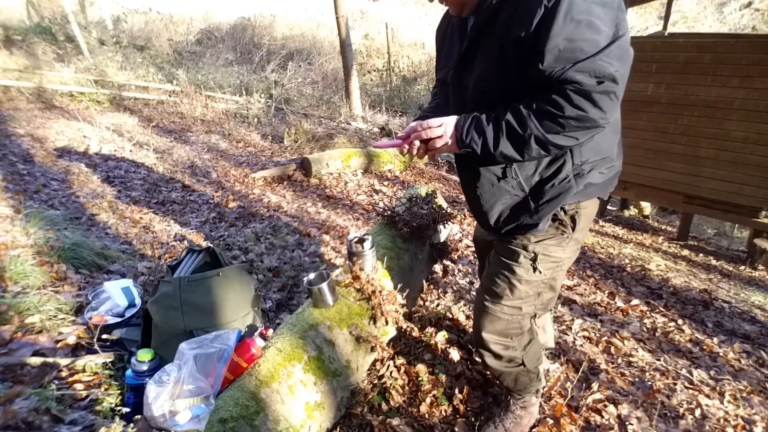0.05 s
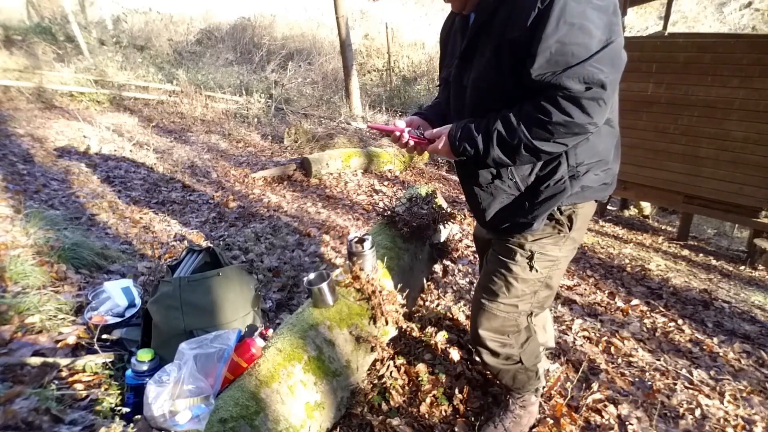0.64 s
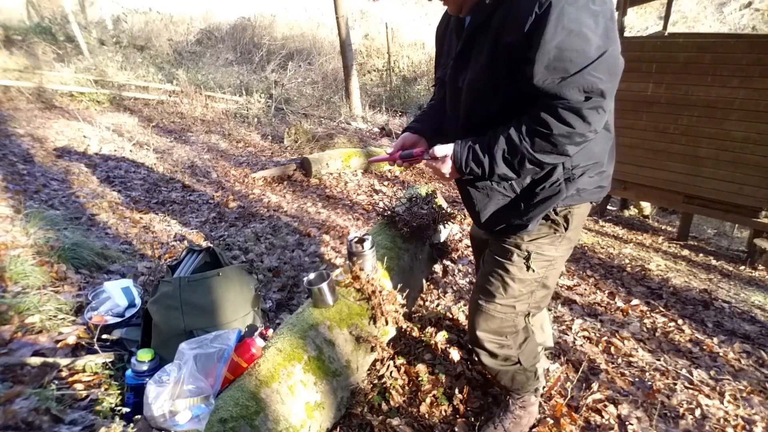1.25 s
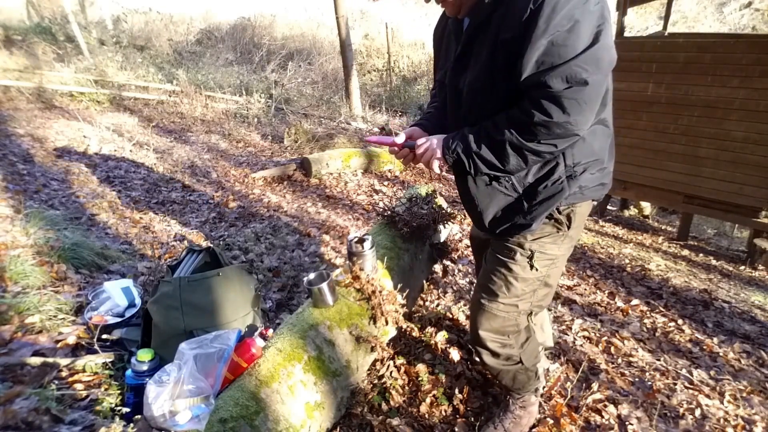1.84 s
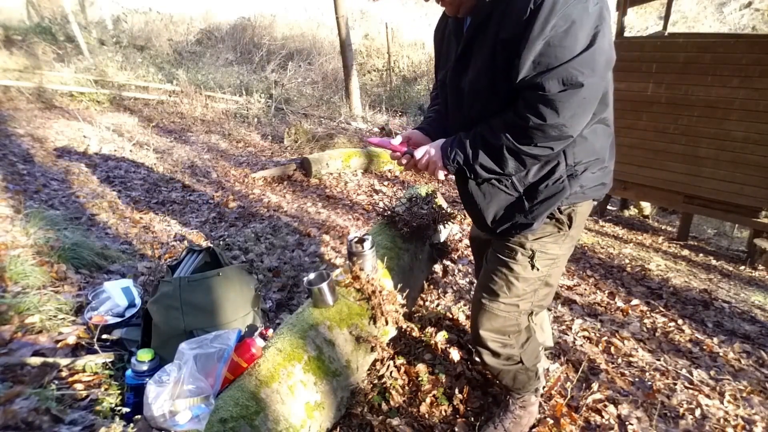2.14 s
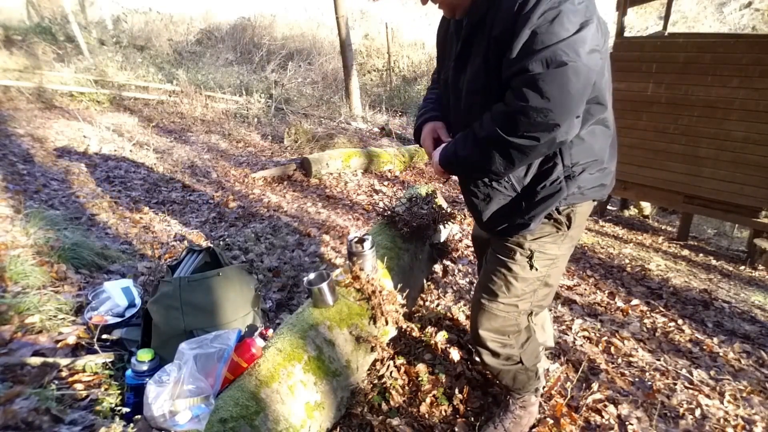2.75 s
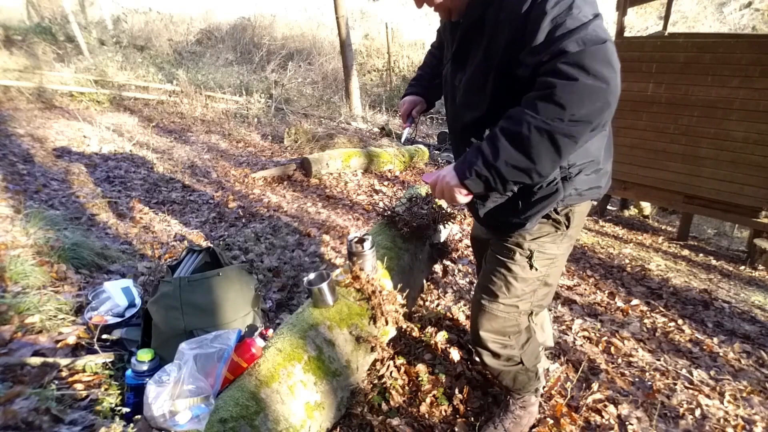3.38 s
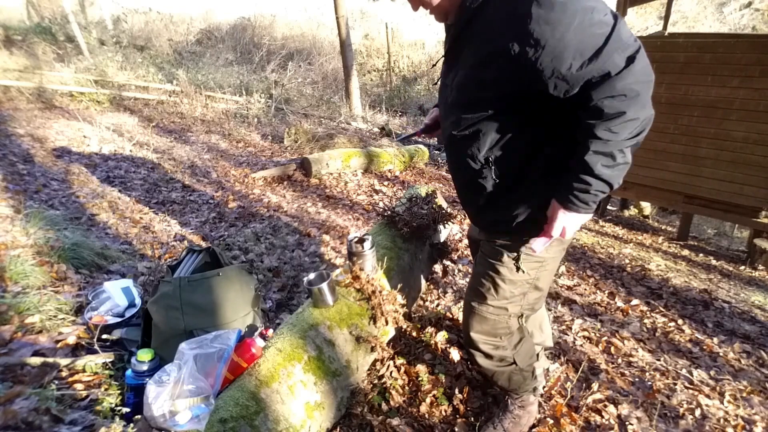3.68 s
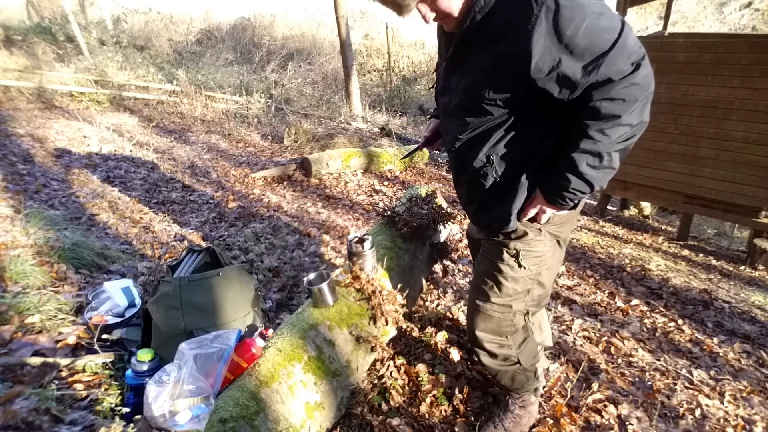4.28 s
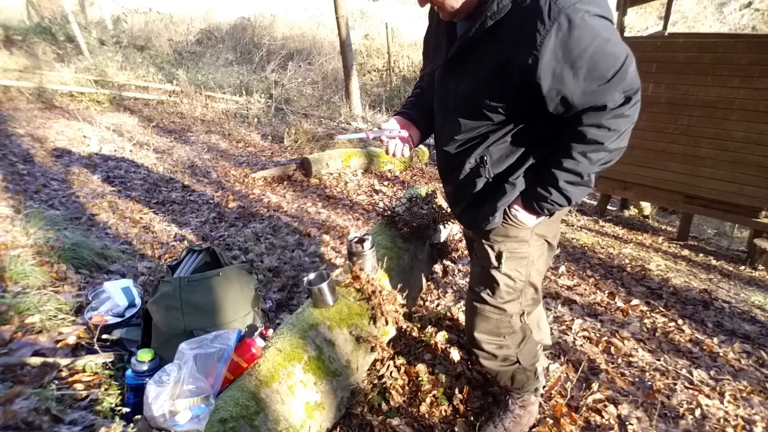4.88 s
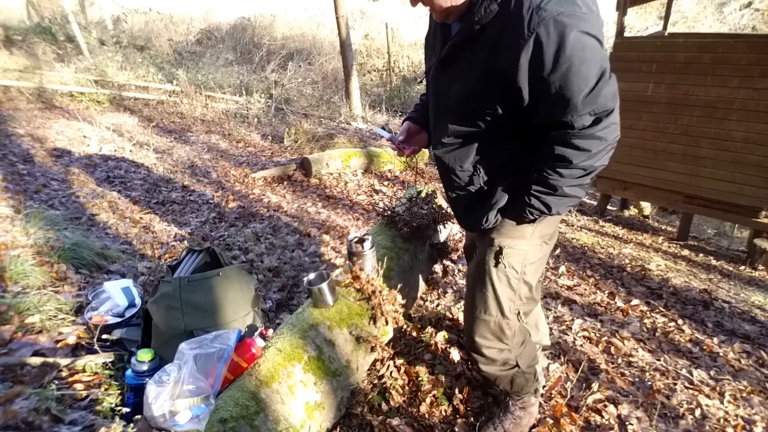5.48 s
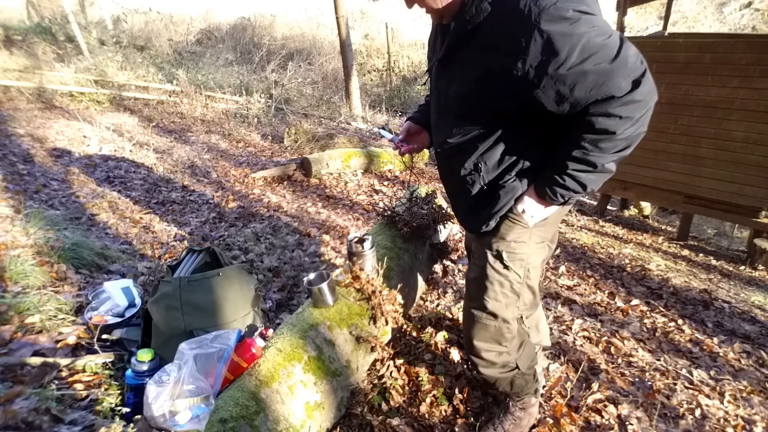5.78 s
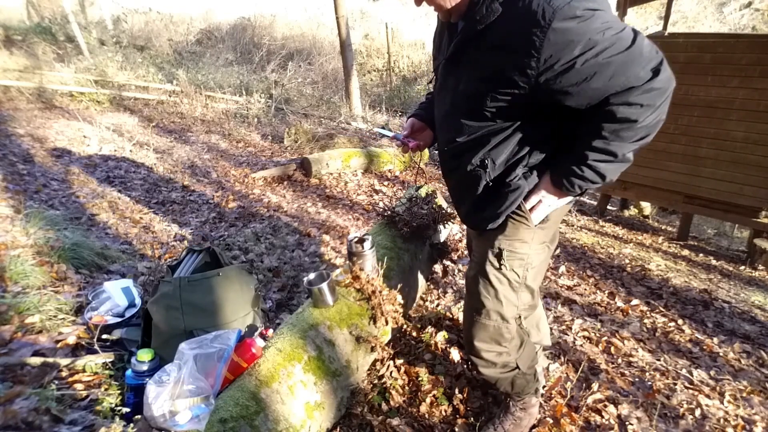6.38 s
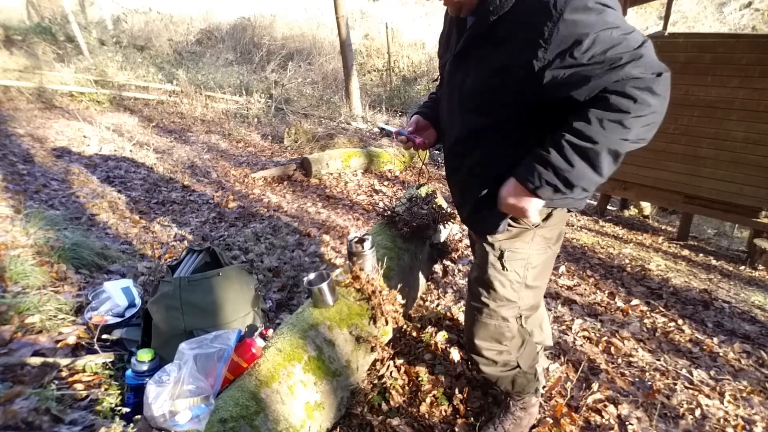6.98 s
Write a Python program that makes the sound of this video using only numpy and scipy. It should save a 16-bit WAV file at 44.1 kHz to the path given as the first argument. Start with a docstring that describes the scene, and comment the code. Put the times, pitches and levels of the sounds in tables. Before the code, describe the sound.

A plastic sheath snaps and clicks, a small item drops, then a hand quietly rummages in a trouser pocket outdoors.

```python
"""In quiet woodland, a hand tool with a plastic sheath is handled a step from the microphone. The sheath
snaps, the handle clicks against it and a small piece of gear is dropped: each impact excites damped
normal modes. Jacket sleeves brush, then a hand rummages in a trouser pocket; the friction noise of each
stroke swells and fades with its sliding speed. Faint air noise and a far drone lie underneath."""
import sys
import numpy as np
from scipy import signal
from scipy.fft import rfft, irfft, next_fast_len
from scipy.io import wavfile
from scipy.ndimage import uniform_filter1d, map_coordinates

SR = 44100
rng = np.random.default_rng(int(sys.argv[2]) if len(sys.argv) > 2 else 0)


def materialize(psi):
    """Save the field psi as 16-bit PCM at rate SR to the path in sys.argv[1].

    A 1-D psi becomes a single channel; in a 2-D psi each row is a channel.
    """
    bounded = np.clip(np.atleast_2d(psi).T, -1, 1)
    quanta = np.round(bounded * 32767).astype(np.int16)
    wavfile.write(sys.argv[1], SR, quanta)


N = 314433

# Normal modes of the hollow sheath, the handle and the dropped piece:
# (frequency [Hz], relative level [dB], 60 dB decay time [s])
SHEATH_MODES = [(777, -14.5, 0.071), (1620, -8, 0.051), (1740, -8.5, 0.038), (1986, 3, 0.036),
                (2065, -3.5, 0.053), (2330, -2.5, .036), (2520, -1.5, 0.021), (2680, 2.5, 0.026),
                (3170, -4, .035), (3455, -5, 0.031), (3850, -19, 0.0252), (4200, -22.5, .042),
                (5730, -10, 0.016), (7150, -17.5, .036)]
HANDLE_MODES = [(1036, -21.5, 0.022), (1480, -19, .012), (1736, 1.5, 0.0089), (2062, 3, 0.033),
                (2600, -7, 0.037), (3230, -1.5, 0.02), (3470, -3, 0.015), (4280, -5, 0.022),
                (4870, -8, 0.018), (5250, 3, 0.012), (5750, -14.5, .012), (6500, -24, .012)]
PIECE_MODES = [(303, -19.5, 0.048), (442, -18.5, 0.048), (910, -6, 0.038), (1390, -4, 0.017),
               (1796, -10, 0.058), (2014, 6, 0.019), (2230, -4.5, 0.028), (2950, -4, 0.042),
               (4300, -8, 0.047), (4900, -6, 0.033), (5280, -0.5, .022), (5420, -4, 0.022),
               (6730, -10, 0.022)]
# Impacts: (time [s], level [dB], decay time factor [ratio], mode weight at 900 Hz [dB],
# at 3.2 kHz [dB], at 4.8 kHz [dB], relative crack level [dB])
SHEATH_SNAPS = [(.0857, -18, 0.99, 0.5, 3.5, 0, -9.5), (.09196, -30, 0.63, -10.5, -8.5, 3, -4)]  # the catch snaps over and seats
HANDLE_CLICKS = [(.1221, -33, 1, -17, 0, -11, 1), (.6214, -35.5, 1, 2, 3.5, 2.5, -7),
                 (.7292, -53.5, 0.85, -8, -7, -6, -16), (.8299, -39, 0.68, -11, -4, -18, -13),
                 (.8562, -42.5, 1, -4, -8, -15, -15), (1.1432, -50, .6, -4, 2, -12, -8),
                 (1.2084, -35, 0.57, -17, 8.5, -5, -9), (1.2898, -49, 0.48, 5, -2, 12, 1),
                 (2.2666, -60.5, 0.44, -5, 4, -4, 3), (2.3200, -57, 0.86, -6, 1, 1, 0),
                 (2.7303, -61, .6, 0, 11, 5, -2), (3.0715, -57.5, 0.55, 2, -4, -1, -7)]  # a tight grip shortens the ring
PIECE_BOUNCES = [(3.3212, -53.5, 0.68, 19, -8, -3, -10.5), (3.3231, -44, 0.67, 12.5, -10, 15.5, 4.5),
                 (3.3260, -46, 0.46, 8, -11, 1, 2.5), (3.3300, -51, 0.81, 10, -4, -3, 6),
                 (3.3360, -37, 0.45, -5, -9, -6, -6.5), (3.3383, -29, 0.92, -10, -1, -7, -8),
                 (3.3422, -47.5, 0.84, 12, -3, -2, 0), (3.3490, -53, 0.73, 10.5, 0, 6, 2.5),
                 (3.3598, -58, 1, 4, 4, 7, 5)]  # it lands on one end, then the other, and rattles
# Soft knocks of things in the hand or under cloth: (time [s], level [dB], frequency [Hz])
SOFT_KNOCKS = [(.478, -52, 600), (3.713, -43, 650), (3.895, -38.5, 620), (4.245, -49, 600),
               (4.463, -42.5, 626), (4.524, -45, 595), (4.648, -50, 553), (4.850, -41.5, 700),
               (5.197, -42, 480), (6.392, -35.5, 676)]
# Sliding strokes: (time of peak speed [s], rise [s], fall [s], swish level [dB], hiss level [dB])
SLEEVE_STROKES = [(.075, .237, .15, -52.5, -58.5), (.48, 0.2, 0.064, -63.5, -69),
                  (.562, .047, 0.19, -69.4, -72), (.876, 0.15, 0.1, -61.5, -67.5),
                  (1.106, 0.17, 0.094, -65, -72.5), (1.408, .203, .109, -65.5, -68.5),
                  (1.648, .11, 0.2, -59.5, -65.5), (2.052, 0.12, 0.17, -66, -73),
                  (2.505, .081, .097, -61, -64.5), (2.613, .1, 0.097, -63, -63.5),
                  (2.81, 0.107, 0.11, -66.5, -68.5), (3.069, 0.077, 0.062, -69.1, -70),
                  (3.683, 0.24, 0.3, -68, -73.5)]
POCKET_STROKES = [(3.83, 0.067, 0.17, -60, -55), (4.01, .04, .26, -63.5, -59.5),
                  (4.371, 0.13, 0.065, -60, -60.5), (4.495, .03, .03, -68, -55),
                  (4.53, .02, 0.053, -63.5, -57.8), (4.745, 0.22, 0.33, -57.5, -58.1),
                  (5.016, 0.12, .103, -56, -57.5), (5.221, 0.14, .145, -62.5, -66.5),
                  (5.297, .048, 0.094, -61, -60.5), (5.466, 0.12, 0.092, -53, -54.5),
                  (5.73, 0.15, .199, -55, -55.5), (5.952, 0.07, .3, -57, -58),
                  (6.173, 0.16, 0.062, -51.5, -51), (6.445, 0.21, 0.16, -55.5, -53),
                  (6.81, 0.23, 0.12, -57.3, -55.8), (6.998, .043, 0.072, -66, -60)]
# Glides of ribbed cloth: (time [s], duration [s], first pitch [Hz], last pitch [Hz], level [dB])
RIB_GLIDES = [(2.558, 0.13, 1290, 1120, -63), (2.79, 0.083, 1950, 1450, -63.5),
              (3.648, .11, 1960, 1930, -67), (5.389, 0.074, 1200, 1450, -61),
              (5.618, 0.097, 1400, 1890, -58), (5.706, 0.089, 1850, 1356, -59),
              (6.064, 0.096, 893, 1344, -57.5), (6.13, 0.048, 1420, 1655, -47.5),
              (6.31, 0.073, 1160, 1560, -61)]
# Noise spectra of impact, jacket, trousers and air: (frequency [Hz], relative spectral density [dB])
CRACK_SPECTRUM = [(300, -43.5), (1200, -4.5), (3000, 1.5), (5500, -3), (8000, -6), (12000, -8),
                  (16000, -17)]
NYLON_SPECTRUM = [(120, -37), (200, -5.5), (525, -0.5), (923, -1), (1330, -2.5), (1560, -5.5), (1740, -2.5),
                  (1910, -5), (3420, -10), (5110, -12.5), (6020, -17), (13600, -18.5), (15500, -22)]
TWILL_SPECTRUM = [(59, -32), (100, -7), (300, -3), (601, 1.5), (1340, -3.5), (1550, -5), (2180, -9),
                  (3050, -10), (4190, -6.5), (5170, -8.5), (5870, -13.5), (7250, -12.5), (8580, -18),
                  (10200, -12.5), (15500, -18)]
AIR_SPECTRUM = [(12, -32), (22, -12.5), (35, -13), (50, -5.5), (85, -4.5), (120, -9.5), (180, -13),
                (480, -19), (630, -17.5), (1000, -33.5), (2000, -26), (3600, -31), (5100, -44), (6200, -42),
                (15000, -37.5)]
# Bands of the far drone: (centre frequency [Hz], level [dB])
DRONE_BANDS = [(60, -78), (128, -83)]
# Reverberation of the place: (frequency [Hz], 60 dB decay time [s])
REVERB_TIMES = [(300, .2), (2000, 0.29), (10000, 0.041)]
# Likeness of left and right in cloth and air noise: (frequency [Hz], correlation [ratio])
STEREO_COHERENCE = [(60, 0.68), (400, 0.67), (1500, 0.67), (2200, 0.89), (4000, 0.4), (6000, 0.24),
                    (7000, 0.69), (10000, 0.19), (15000, 0.314)]
# Balance of that noise: (frequency [Hz], left minus right level [dB])
STEREO_BALANCE = [(100, 0), (600, 2), (1100, 2.3), (2300, 3.5), (3400, 0.5), (5200, 6.5), (6200, -2),
                  (9000, 0.5), (15000, 2)]


def gear():
    """Impact radiation: sheath, handle and dropped piece ring a little to the left."""
    snap = impacts(SHEATH_SNAPS, SHEATH_MODES, crack_t60=0.046, scatter_db=1.4, spread=0.25, skew=0.36)
    clicks = impacts(HANDLE_CLICKS, HANDLE_MODES, crack_t60=0.013, scatter_db=1, spread=0.3, skew=1)
    drop = impacts(PIECE_BOUNCES, PIECE_MODES, crack_t60=0.026, scatter_db=0.5, spread=0.68, skew=0.75)
    # things this small radiate little bass
    in_hand = signal.sosfilt(signal.butter(3, 520, "high", fs=SR, output="sos"), snap + clicks)
    return from_left(in_hand + drop, lead_ms=0.06) * amp([[1.1], [-1.1]])


def impacts(contacts, modes, crack_t60, scatter_db, spread, skew):
    """Modal superposition: a contact rings the modes, weighted by where it lands, under a short crack."""
    out, t = np.zeros((2, N)), np.arange(SR // 6) / SR
    hz, mode_db, t60 = np.transpose(modes)
    attack = 1 - np.exp(-t / 0.0003)
    for s, db, ring, low_db, mid_db, high_db, crack_db in contacts:
        place_db = along([(900, low_db), (2000, 0), (2300, 0), (3200, mid_db), (4800, high_db)], hz)
        gain = amp(mode_db + place_db + scatter_db * rng.standard_normal((2, len(hz))))
        # a clean contact starts the modes in phase, a skidding one spreads them
        start = np.pi / 4 + spread * rng.uniform(-1.6, 1, len(hz))
        # shorter waves differ more in phase between left and right
        offset = skew * hz / hz.mean() * rng.uniform(-1.06, 1, len(hz))
        phase = start + np.array([offset, -offset])
        tones = np.sin(2 * np.pi * hz[:, None] * t + phase[..., None]) * fade(t, ring * t60[:, None])
        ringing = (gain[..., None] * tones).sum(1)
        noise = filtered(rng.standard_normal((2, len(t))), lambda f: amp(along(CRACK_SPECTRUM, f)))
        crack = amp(crack_db) * unit(noise) * fade(t, crack_t60)
        add(out, s, amp(db) * (ringing + crack) * attack)
    return out


def soft_knocks():
    """Heavy damping: two inharmonic partials die within a few cycles."""
    out, t = np.zeros(N), np.arange(SR // 20) / SR
    for s, db, hz in SOFT_KNOCKS:
        knock = np.sin(2 * np.pi * hz * t) - 0.35 * np.sin(2 * np.pi * 1.7 * hz * t)
        add(out, s, amp(db) * knock * fade(t, t60=0.0087))
    return out * amp([[1], [-1]])


def clothes():
    """Sliding friction: sleeves brush the jacket, then the hand works through the pocket."""
    nylon = stereo_noise(NYLON_SPECTRUM, lead_ms=0.1, flicker_db=1, rate_hz=160)
    jacket = shifting_colour(nylon, depth_db=2.5)
    twill = stereo_noise(TWILL_SPECTRUM, lead_ms=0.18, flicker_db=0.66, rate_hz=250)
    trousers = shifting_colour(twill, depth_db=2)
    entry_s, reach_s = POCKET_STROKES[0][:2]
    in_pocket = np.clip((np.arange(N) / SR - entry_s) / reach_s + 1, 0, 1)
    sleeve = rubbing(jacket, SLEEVE_STROKES, split_hz=4100, contact=1 - in_pocket,
                     creep_db=(-69.5, -76.5))
    pocket = rubbing(trousers, POCKET_STROKES, split_hz=2500, contact=in_pocket, creep_db=(-65.5, -70.5))
    return sleeve + pocket + rib_tones(half_width_hz=96)


def rubbing(cloth, strokes, split_hz, contact, creep_db, speed_exponent=1.34):
    """Friction noise grows as a power of speed: folds give the low swish, threads the hiss."""
    # one row each for swish and hiss; cloth in contact still creeps between strokes
    power = np.outer(amp(creep_db), contact) ** 2
    for peak_s, rise_s, fall_s, swish_db, hiss_db in strokes:
        speed = sliding_speed(peak_s, rise_s, fall_s)
        power += np.outer(amp([swish_db, hiss_db]), speed ** speed_exponent) ** 2
    swish_gain, hiss_gain = np.sqrt(power)
    swish = filtered(cloth, lambda hz: 1 / (1 + (hz / split_hz) ** 6))
    hiss = cloth - swish
    return swish_gain * swish / np.std(swish.mean(0)) + hiss_gain * hiss / np.std(hiss.mean(0))


def sliding_speed(peak_s, rise_s, fall_s):
    """Acceleration and deceleration: the hand's speed follows a cosine arc from 0 to 1 and back."""
    t = np.arange(N) / SR - peak_s
    progress = np.clip(t / np.where(t < 0, rise_s, fall_s), -1, 1)
    return np.abs(np.cos(np.pi / 2 * progress))


def shifting_colour(cloth, depth_db):
    """Spectral modulation: random patches of level shift the rustle's colour from moment to moment."""
    spectra = signal.stft(cloth, nperseg=512)[2]
    patches = uniform_filter1d(rng.standard_normal(spectra.shape[1:]), size=3, axis=0)  # over frequency
    patches = uniform_filter1d(patches, size=10, axis=1)  # over time
    return signal.istft(spectra * amp(depth_db * unit(patches)), nperseg=512)[1][:, :N]


def rib_tones(half_width_hz):
    """Periodic excitation: cloth sings at the rate its ribs pass; uneven ribs broaden the tone."""
    out = np.zeros(N)
    for s, duration, first_hz, last_hz, db in RIB_GLIDES:
        progress = np.linspace(0, 1, int(duration * SR))
        noise = rng.standard_normal((2, len(progress)))
        fuzz = unit(filtered(noise, lambda hz: 1 / (1 + (hz / half_width_hz) ** 2)))
        phase = 2 * np.pi * np.cumsum(first_hz + (last_hz - first_hz) * progress) / SR
        tone = fuzz[0] * np.cos(phase) + fuzz[1] * np.sin(phase)
        add(out, s, amp(db) * np.sin(np.pi * progress) * tone)
    return from_left(out * amp([[1.2], [-1.2]]), lead_ms=0.12)


def reverberation(x):
    """Scattering: ground, trunks and a plank wall return a short diffuse tail."""
    hz, t, spectra = signal.stft(rng.standard_normal((2, SR // 3)), SR, nperseg=256)
    tail = signal.istft(spectra * fade(t, along(REVERB_TIMES, hz)[:, None]), SR, nperseg=256)[1]
    delayed = np.pad(tail / np.linalg.norm(tail[0]), ((0, 0), (SR // 250, 0)))  # 4 ms
    return signal.fftconvolve(x, delayed, axes=1)[:, :N]


def woodland():
    """Ambient noise: broadband air and a far drone, whose narrow bands waver by random beating."""
    air = amp(-69) * stereo_noise(AIR_SPECTRUM, lead_ms=0.018, flicker_db=0.9, rate_hz=12)
    drone = np.zeros(N)
    for centre_hz, db in DRONE_BANDS:
        band = filtered(rng.standard_normal(N), lambda hz: np.exp(-((hz - centre_hz) / 13) ** 2))
        drone += amp(db) * unit(band)
    return air + drone


def stereo_noise(spectrum, lead_ms, flicker_db, rate_hz):
    """Partial coherence: two channels share part of a flickering noise; their mean has rms 1."""
    def mid_and_side(hz):
        angle = np.arccos(np.clip(along(STEREO_COHERENCE, hz), 0, 1)) / 2
        return np.array([np.cos(angle), np.sin(angle)])

    def colour(hz):
        balance_db = np.outer([0.5, -0.5], along(STEREO_BALANCE, hz))
        coherence = np.clip(along(STEREO_COHERENCE, hz), 0, 0.95)
        # the delay combs the sum of the channels; dividing by the comb keeps that sum smooth
        comb = np.sqrt(1 + coherence * np.cos(2 * np.pi * hz * lead_ms / 1000))
        return amp(along(spectrum, hz) + balance_db) / comb

    # in cloth, the flicker is tiny contacts catching and slipping
    noise = rng.standard_normal((2, N)) * amp(flicker_db * wobble(rate_hz))
    mid, side = filtered(noise, mid_and_side)
    pair = from_left(filtered(np.array([mid + side, mid - side]), colour), lead_ms)
    return pair / np.std(pair.mean(0))


def from_left(pair, lead_ms):
    """Path difference: the sound reaches the left channel first."""
    return filtered(pair, lambda hz: np.exp(np.outer([1, -1], 1j * np.pi * hz * lead_ms / 1000)))


def wobble(rate_hz):
    """Random modulation: a spline through rate_hz random values a second."""
    knots = rng.standard_normal(int(N * rate_hz / SR) + 4)
    return map_coordinates(knots, [np.arange(N) * rate_hz / SR])


def filtered(x, response):
    """Linear filtering: the spectrum of x times a frequency response."""
    n = x.shape[-1]
    padded = next_fast_len(n + 8192)
    return irfft(rfft(x, padded) * response(np.fft.rfftfreq(padded, 1 / SR)), padded)[..., :n]


def fade(t, t60):
    """Exponential damping: 60 dB in t60."""
    return np.exp(-np.log(1000) * t / t60)


def add(track, s, sound):
    """Superposition: the sound joins the track at s seconds."""
    span = track[..., max(round(s * SR), 0):][..., :sound.shape[-1]]
    span += sound[..., :span.shape[-1]]


def along(points, hz):
    """Interpolation of (frequency, value) points on a logarithmic frequency axis."""
    frequencies, values = np.transpose(points)
    return np.interp(np.log(hz + 1), np.log(frequencies + 1), values)


def amp(db):
    """The decibel scale: level to amplitude ratio."""
    return 10 ** (np.asarray(db) / 20)


def unit(x):
    """Normalisation to rms 1."""
    return x / np.sqrt(np.mean(x ** 2) + 1e-20)


def scene():
    """Superposition of the gear, its faint reverberation, the clothing and the woodland."""
    hits = gear()
    return hits + amp(-25.5) * reverberation(hits) + soft_knocks() + clothes() + woodland()


def record(dry):
    """Band limiting: nothing above 15650 Hz passes."""
    return filtered(dry, lambda hz: hz < 15650)


dry = scene()
out = record(dry)
materialize(out)
```